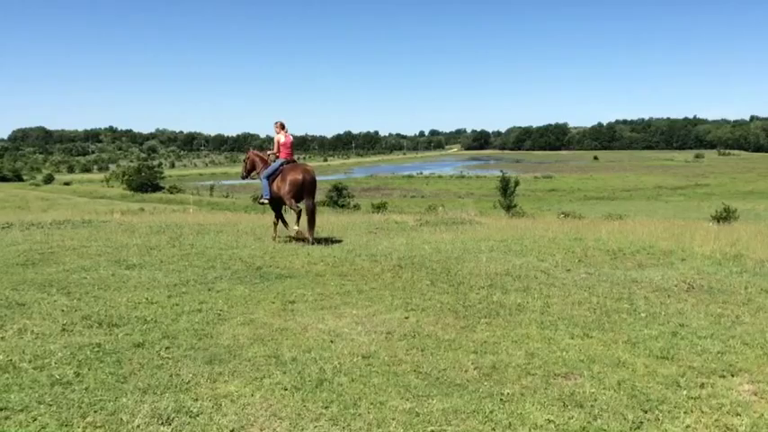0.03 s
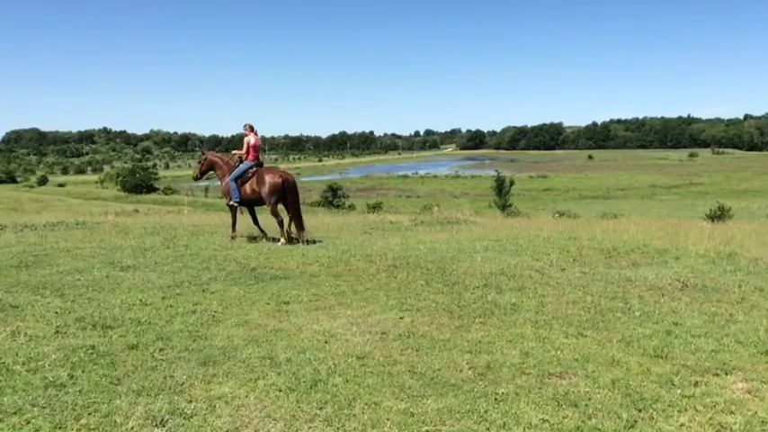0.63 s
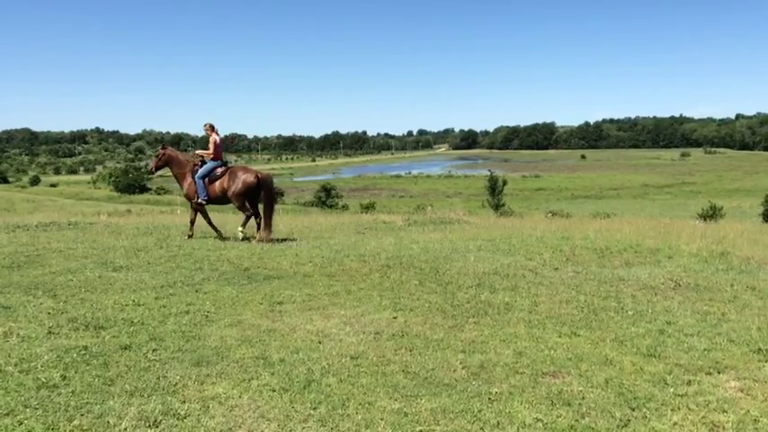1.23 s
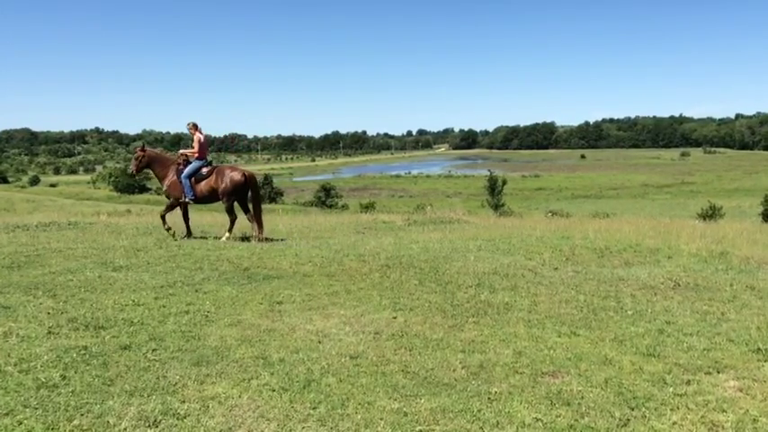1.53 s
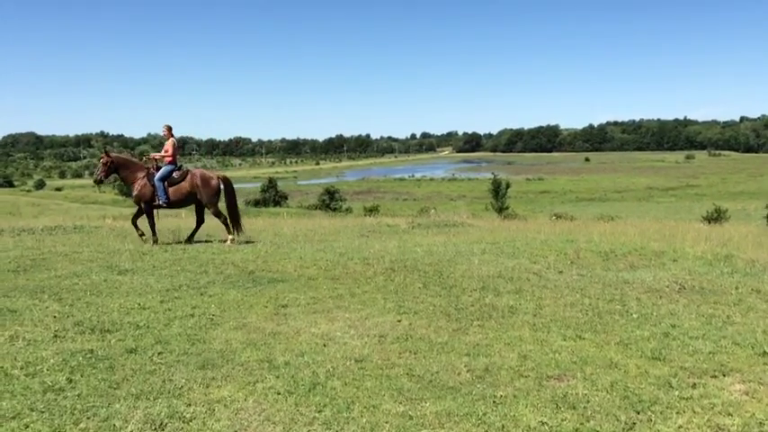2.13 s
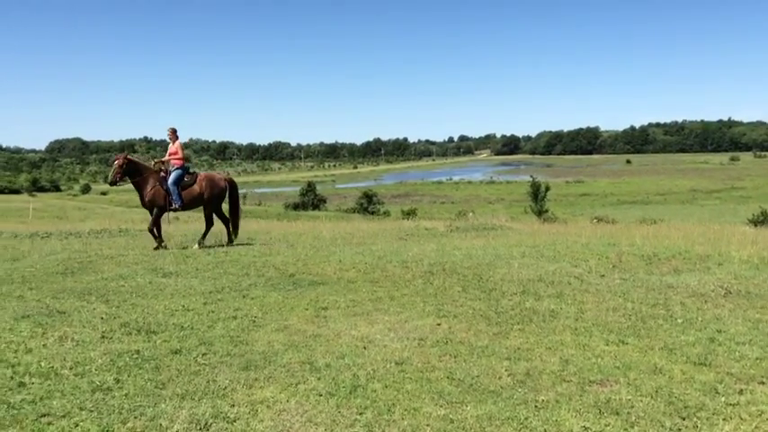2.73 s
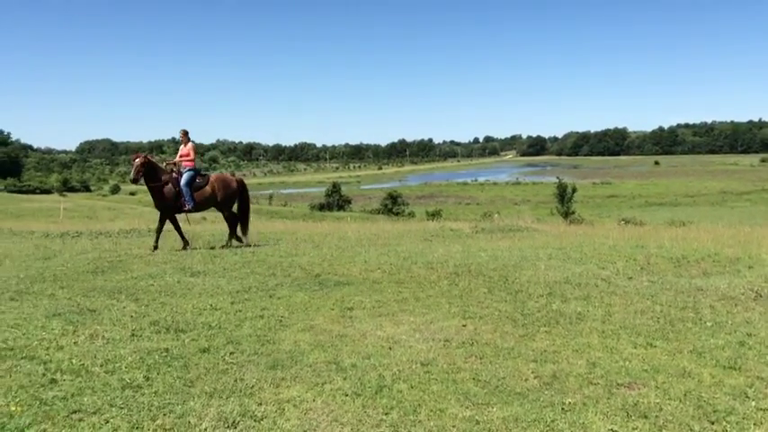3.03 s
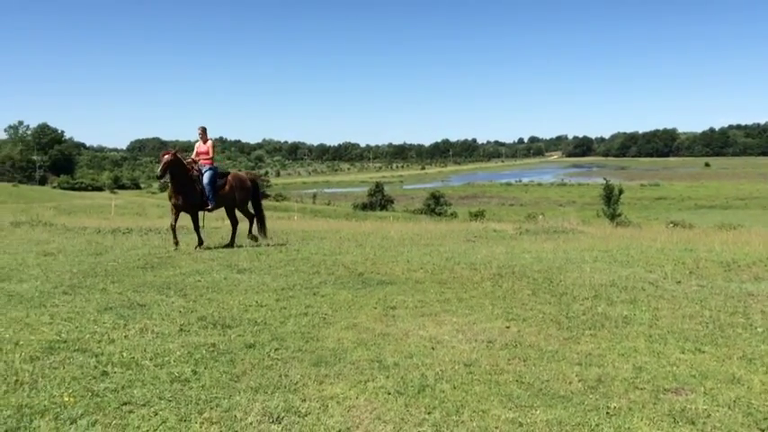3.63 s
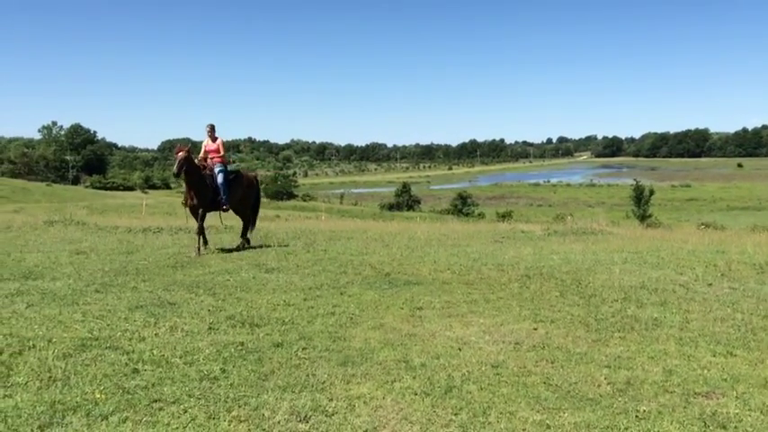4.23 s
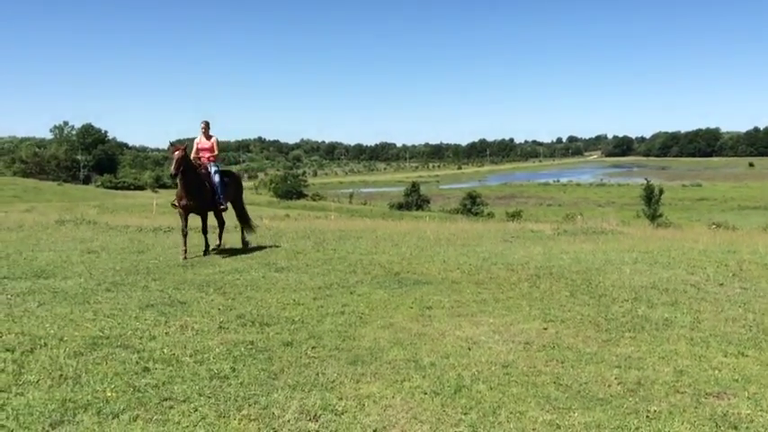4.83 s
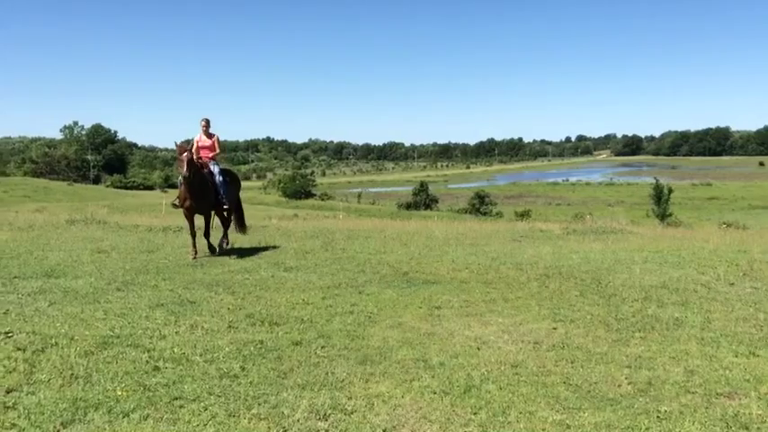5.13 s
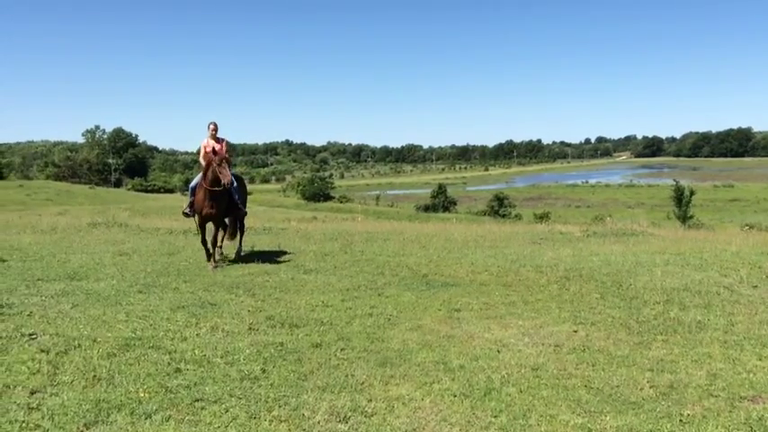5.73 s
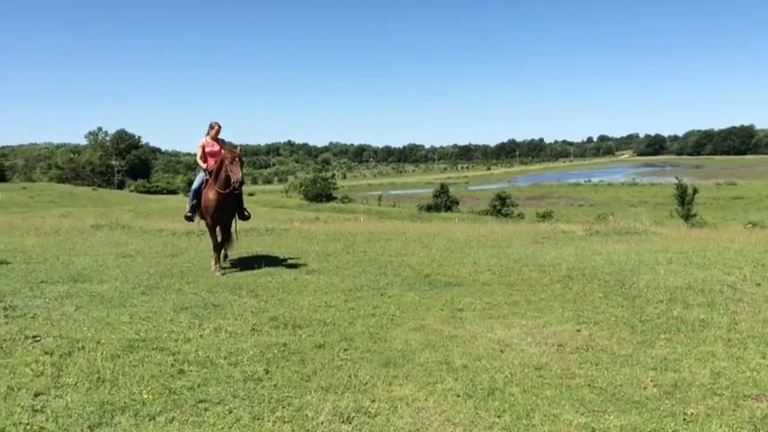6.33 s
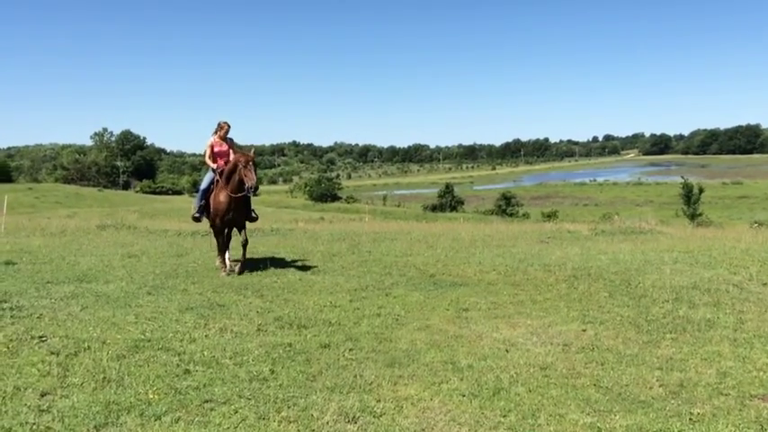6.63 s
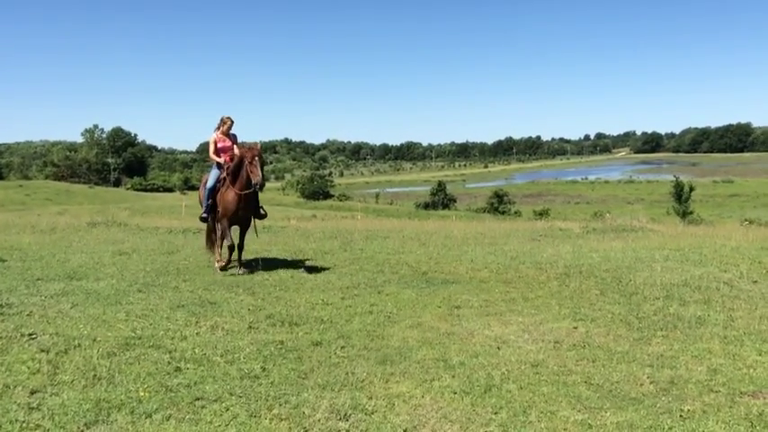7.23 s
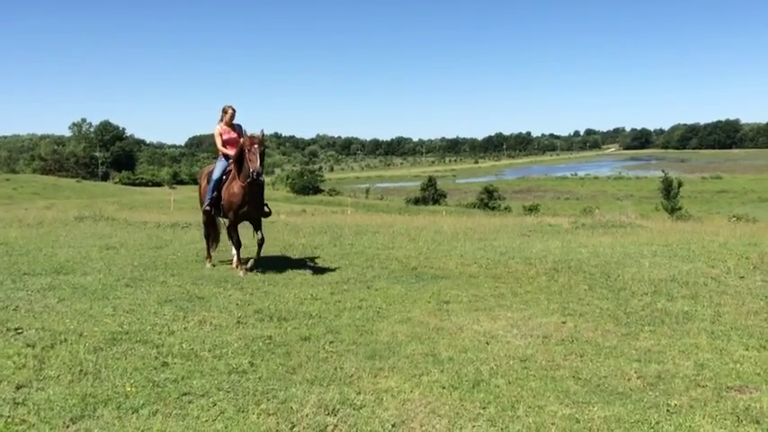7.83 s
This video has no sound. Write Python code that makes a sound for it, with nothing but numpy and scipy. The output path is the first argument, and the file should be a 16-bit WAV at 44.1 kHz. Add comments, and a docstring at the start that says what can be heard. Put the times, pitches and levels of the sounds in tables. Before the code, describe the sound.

An open pasture, with a low breeze on the microphone, faint dry grass rustle and a soft wash of distant trees. In the first 0.6 seconds a nearby bird sings three high, buzzy syllables, joined by wind thumps and light finger ticks. A distant bird whistles at about 1 second. From 2.3 to 4 seconds the wind buffets harder in irregular low bumps, peaking near 3.7. A quick, quiet trill comes at 3.8 seconds. From about 4.1 to 4.8 a horse snorts once, a fluttering, breathy run of nostril bursts. Two short bird chips follow just after 5 seconds as the wind eases. Between 6 and 7.2 an insect gives three very faint, thin rasps over a faint far drone. From 7.2 seconds more chips grow louder, with soft distant whistles and a last wind bump near 7.8.

```python
"""Horse snort in a windy pasture.

A horse snorts once: its nostrils flap, and each burst of air rings the nose and hisses.
Near birds sing three buzzy syllables, trill and give flight chips; far birds whistle and twitter.
Wind eddies buffet the microphone, dry grass rustles, fingers tick on the camera.
Behind them: an insect's thin rasps, the wash of distant trees and a faint drone."""
import sys
import numpy as np
from scipy import signal
from scipy.fft import rfft, irfft, next_fast_len
from scipy.io import wavfile
from scipy.ndimage import uniform_filter1d, map_coordinates

SR = 44100
rng = np.random.default_rng(int(sys.argv[2]) if len(sys.argv) > 2 else 0)


def master(y):
    """Save y as 16-bit WAV."""
    cut = np.clip(np.atleast_2d(y).T, -1, 1)
    pcm = np.round(cut * 32767)  # scale
    wavfile.write(sys.argv[1], SR, pcm.astype(np.int16))


N = 348390
TIME = np.arange(N) / SR

# Table levels are relative; the functions add their gains.
# air surges of the snort: peak t/s, width/s, level/dB, flap rate/Hz, main nasal f/Hz
SNORT_SURGES = [(4.092, .045, -58, 65, 1200), (4.24, .026, -45.5, 91, 1240), (4.303, .02, -58, 80, 1100),
                (4.37, .034, -50, 91, 1070), (4.493, .048, -52, 65, 1070), (4.63, .045, -53, 51, 1080)]
# air through the open nostrils: t/s, length/s, level/dB
NOSTRIL_AIR = [(4.18, 0.47, -69.5), (4.32, .0044, -59), (4.458, 0.0035, -60.5), (4.475, 0.096, -73.5),
               (4.592, 0.0036, -65.5), (4.797, 0.0044, -63.5)]
# nasal modes rung by flaps and by hiss: f/Hz, width/Hz, level/dB
FLAP_MODES = [(572, 88, 2), (1100, 63, 1.5), (1505, 175, -3.5)]
HISS_MODES = [(1960, 110, 6.5), (3380, 194, 1), (3770, 89, 6.5), (4330, 360, 2.5), (4860, 120, 1.5)]
# song syllables, flight chips: t/s, level/dB
SYLLABLES = [(.1450, -40.5), (.3420, -40), (0.542, -44)]
FLIGHT_CHIPS = [(5.0096, -56), (5.309, -57), (7.169, -61), (7.461, -55), (7.7200, -54), (7.812, -51),
                (7.8965, -48)]
# pips opening a syllable: t/s from the slur, length/s, start f/Hz, end f/Hz, level/dB
LISP_PIPS = [(-.114, .012, 7000, 8450, -16.5), (-.1, .007, 6100, 5100, -12), (-.099, .007, 7740, 7300, -15),
             (-.088, .006, 6570, 8300, -9.5), (-.076, .01, 7000, 7260, -12.5)]
# note contours: t/s from the note's anchor, f/Hz, level/dB
BUZZ_SHAPE = [(-.06, 4100, -22), (-.055, 4100, -7), (-.046, 4150, -.5), (-.015, 4150, -5), (0, 4500, -3)]
SLUR_SHAPE = [(0, 6400, -5), (.005, 4700, -1), (.013, 4270, 2), (.02, 3640, -0.5), (.028, 3320, -0.5),
              (.042, 3300, -19)]
RISE_SHAPE = [(-.005, 3800, -14), (-.002, 3950, 3), (.0005, 4600, -2), (.0025, 5300, -19)]
FALL_SHAPE = [(-.0005, 3100, -14), (.002, 3850, 8.5), (.0045, 3300, 6.5), (.011, 3010, 0),
              (.022, 2780, -14)]
SWEEP_SHAPE = [(0, 6000, -26), (.01, 5130, -10), (.019, 4250, 1), (.026, 3880, -20)]
HOOK_SHAPE = [(0, 4750, -17), (.005, 4110, -6), (.012, 3800, -2), (.019, 3740, -2.5), (.024, 3900, -20)]
# far whistles: t/s, length/s, start f/Hz, middle f/Hz, end f/Hz, level/dB
FAR_WHISTLES = [(.8, .11, 1490, 1470, 1460, -72), (1.058, .088, 2320, 2395, 2450, -54.5),
                (1.347, .033, 3580, 3520, 3460, -67), (1.765, .035, 2550, 2130, 2050, -70),
                (7.415, .1, 1930, 1965, 1920, -70), (7.565, .055, 2250, 2400, 2850, -70),
                (7.612, .035, 2780, 2900, 2680, -69), (7.665, .087, 2190, 2215, 2560, -69.5)]
# gusts at the microphone: t/s, length/s, level/dB
WIND_GUSTS = [(.38, 0.24, -49.5), (1.05, .12, -43.5), (2.29, 0.029, -39), (2.65, 0.095, -37),
              (2.94, .1, -38), (3.29, .04, -38), (3.41, 0.064, -40.5), (3.56, 0.13, -43), (3.69, .09, -42),
              (3.86, 0.037, -38), (4.0, 0.18, -42), (4.25, .28, -46.5), (4.645, 0.012, -39),
              (4.76, 0.092, -47.5), (5.17, 0.09, -47.5), (5.64, 0.084, -45.5), (7.84, .033, -40)]
# strongest single eddies at the port: t/s, level/dB, f/Hz
STRONG_EDDIES = [(0.458, -17.5, 206), (0.558, -24, 82), (0.5703, -19, 133), (0.6154, -23.5, 63),
                 (0.9925, -32, 197), (1.1509, -25.5, 206), (2.2973, -29.5, 182), (2.6276, -24, 160),
                 (2.761, -26, 137), (2.84, -27.5, 111), (2.9616, -22, 161), (2.984, -23.5, 146),
                 (3.02, -32.5, 148), (3.246, -27, 139), (3.2784, -26.5, 270), (3.4134, -25, 141),
                 (3.433, -31.5, 207), (3.5078, -25.5, 166), (3.6, -20, 115), (3.7374, -12, 199),
                 (3.7695, -24, 133), (3.779, -22.5, 100), (3.823, -28, 123), (3.8666, -20, 142),
                 (3.94, -28, 168), (4.257, -25.5, 180), (4.645, -28, 109), (4.758, -35.5, 140),
                 (4.968, -27.5, 126), (5.241, -28, 110), (5.7698, -24, 208), (7.8006, -23.5, 137)]
# eddy trains at the port: t/s, length/s, level/dB, f/Hz
EDDY_TRAINS = [(2.283, .035, -40.5, 231.3), (3.277, 0.039, -41, 290), (3.694, 0.02, -37.5, 189.6),
               (3.863, .022, -30, 159.8), (4.599, 0.0026, -35.5, 250), (5.173, 0.024, -50.5, 200.2),
               (4.949, 0.023, -32, 130)]
# dry grass swishes: t/s, length/s, level/dB
GRASS_SWISHES = [(.09, .07, -64), (.2, .05, -67), (.79, .11, -69), (1.01, .05, -61.5), (1.38, .04, -68),
                 (1.49, .04, -66), (1.73, .09, -68.5), (2.055, .04, -59), (2.27, .08, -68.5),
                 (2.61, .06, -70), (2.867, .06, -58.5), (3.34, .11, -67), (3.52, .045, -62),
                 (3.665, .06, -60.6), (3.96, .09, -62.5), (4.17, .17, -64), (4.4, .25, -68),
                 (4.785, .035, -60.2), (5.24, .32, -63.5), (5.85, .03, -73), (6.07, .035, -67),
                 (6.46, .04, -69.5), (6.88, .06, -71), (7.49, .04, -69), (7.71, .18, -73)]
# finger ticks: t/s, level/dB
FINGER_TICKS = [(0.168, -45), (0.4753, -40), (0.729, -50.5), (2.538, -51.5), (3.5573, -53), (7.4599, -54),
                (7.4985, -54)]
# insect scrapes: t/s, length/s
INSECT_RASPS = [(5.945, 0.042), (6.9, .037), (7.18, .031)]
# slow envelopes of breeze and tree wash: t/s, level/dB
BREEZE_LEVEL = [(0, -61.5), (1.7, -58), (4, -54.5), (6.3, -61.5), (7.3, -56.5), (7.9, -60)]
TREE_LEVEL = [(.6, -65), (1.9, -67.5), (6.5, -67)]
# noise spectra of gusts, grass and tree wash: f/Hz, level/dB
GUST_SPECTRUM = [(20, -52), (35, -6.5), (60, 11), (110, 8), (200, 0), (290, -14.5), (420, -27.5),
                 (700, -34), (1500, -58)]
GRASS_SPECTRUM = [(1000, -24), (5000, -7), (6200, -8), (7800, -6), (8400, 1), (11000, 0), (15000, -.5)]
TREE_SPECTRUM = [(20, -11.5), (70, 14.5), (160, 3), (300, -4), (600, -1.5), (1150, -6.5), (1800, -11),
                 (2700, -13), (4200, -17.5), (5500, -16), (6500, -22.5), (15000, -20.5)]
# far drone resonances: f/Hz, width/Hz, level/dB
DRONE_MODES = [(878, 20, 8), (1062, 120, 2), (1266, 154, -5.5), (1540, 130, -11.5)]


def snort(hiss_db=-.5, hiss_db_per_s=4, hiss_ref_s=4.1):
    """Nostrils flap at each surge's own rate; every flap passes air that rings the nose and hisses."""
    breath_spectrum = [(200, 2), (500, 8.5), (1200, 4.5), (1700, -1), (3000, -26), (6000, -35)]
    hiss_spectrum = [(1500, -10), (3000, -2), (5500, -7.5), (6500, 0), (11000, 18)]
    low_mode, main_mode, high_mode = FLAP_MODES
    flaps, chop = np.zeros((2, N))
    for s, width_s, db, flap_hz, nasal_hz in SNORT_SURGES:
        phase = 2 * np.pi * (flap_hz * (TIME - s) + .09 * wobble(45))
        push = np.exp(-.75 * ((TIME - s) / width_s) ** 2)
        opening = unit(.15 + np.exp(1.4 * (np.cos(phase) - 1) + .25 * wobble(90)))
        nose = [low_mode, (nasal_hz, *main_mode[1:]), high_mode]
        flaps += amp(db) * push * resonances(opening * noise(breath_spectrum), nose)
        chop += push * opening
    hiss = resonances((1 + chop) * noise(hiss_spectrum), HISS_MODES)
    airflow = swells(NOSTRIL_AIR, attack_s=.0055, release_s=.011)
    return flaps + airflow * amp(hiss_db + hiss_db_per_s * (TIME - hiss_ref_s)) * hiss


def songbird(pulse_s=.00993, join_s=.0162, lisp_db=-1, slur_db=1):
    """Per syllable: a thin two-voiced lisp, a buzz whose pulses merge, a loud falling slur."""
    out = np.zeros(N)
    for s, db in SYLLABLES:
        buzz = note(BUZZ_SHAPE, warble=.35, warble_hz=370 * (1 + rng.normal(0, .029)))
        t = BUZZ_SHAPE[0][0] + np.arange(len(buzz)) / SR
        gate = np.where(t < -join_s, np.abs(np.sin(np.pi * t / pulse_s)) ** 1.3, 1)
        add(out, s + t[0], amp(db) * buzz * uniform_filter1d(gate, size=40))
        for offset_s, *pip in LISP_PIPS:
            add(out, s + offset_s, amp(db + lisp_db) * glide(*pip, warble=.031, warble_hz=325))
        add(out, s, amp(db + slur_db) * note(SLUR_SHAPE))
    return out


def flying_bird(gap_s=.0108, first_db=-4, cut_s=.0055, echo_db=-10, echo_s=.0024):
    """Per chip: two flicks of a rising and a falling voice, the first weak and short; ground echo."""
    out = np.zeros(N)
    for s, db in FLIGHT_CHIPS:
        scale = 1 + rng.normal(0, .015)
        delay_s = echo_s * rng.uniform(.4, 2)
        flicks = [(s - gap_s, db + first_db, cut_s), (s, db, FALL_SHAPE[-1][0])]
        for flick_s, flick_db, ring_s in flicks:
            fall = note(FALL_SHAPE, scale)
            fall *= np.exp(-(np.arange(len(fall)) / SR / ring_s) ** 6)
            for at_s, path_db in [(flick_s, flick_db), (flick_s + delay_s, flick_db + echo_db)]:
                rise_db = path_db + rng.normal(0, 1.3)
                rise = note(RISE_SHAPE, scale, warble=.072, warble_hz=450)
                add(out, at_s + RISE_SHAPE[0][0], amp(rise_db) * rise)
                add(out, at_s + FALL_SHAPE[0][0], amp(path_db) * fall)
    return scatter(out, t60_s=.2, wet_db=-12)


def trilling_bird(start_s=3.7935, period_s=.0262, gain_db=-57.5, hold_s=.22, fade_db_per_s=90):
    """A downward sweep, then an even run of short hooks that holds and fades."""
    out = np.zeros(N)
    for k in range(13):
        age_s = k * period_s
        db = gain_db - fade_db_per_s * max(age_s - hold_s, 0)
        tone = note(HOOK_SHAPE if k else SWEEP_SHAPE, scale=1 + rng.normal(0, .005))
        add(out, start_s + age_s, amp(db) * tone)
    return out


def wind(gust_db=.5, wake_db=-10.5, eddy_db=3, stray_db=7, stray_hz=190, strays=260):
    """Faint breeze, turbulent gusts, strong eddies with wakes; stray eddies ride on the gusts."""
    breeze = amp(curves(BREEZE_LEVEL)[0] + 3.1 * wobble(13))
    breeze *= noise([(20, -27), (40, -5), (70, 5), (140, -4.5), (250, -13), (600, -43.5), (2000, -120)])
    churn = noise(GUST_SPECTRUM)
    churn /= np.sqrt(np.abs(uniform_filter1d(churn ** 2, size=1500)) + .22)  # even strength
    churn = unit(churn * amp(5.5 * np.tanh(wobble(45))))  # lumps from larger eddies
    gusts = swells(WIND_GUSTS, attack_s=.021, release_s=.031)
    wakes = swells([(s, 0, db + wake_db) for s, db, _ in STRONG_EDDIES], attack_s=.015, release_s=.015)
    eddies, lead_s = np.zeros(N), .02
    for s, db, hz in STRONG_EDDIES:
        add(eddies, s - lead_s, amp(db + eddy_db) * eddy(hz))
    force = gusts.max() * (gusts / gusts.max()) ** 1.2
    for k, (when, size, pitch, side) in enumerate(rng.uniform(-.94, 1, (strays, 4))):
        at = int((k + (when + 1) / 2) / strays * N)
        gain = np.sign(side) * force[at] * amp(stray_db + 4 * size)
        spike = eddy(stray_hz * 2 ** (pitch / 2), width_cycles=.25, swing=.43)
        add(eddies, at / SR - lead_s, gain * spike)
    return breeze + np.hypot(amp(gust_db) * gusts, wakes) * churn + eddies


def eddy(hz, width_cycles=.17, swing=.44):
    """Rounded pressure spike that swings back; a smaller eddy passes faster."""
    t = np.arange(-SR // 50, SR // 20) / SR
    spike = np.exp(-(t * hz / width_cycles) ** 2)
    return signal.lfilter(*signal.butter(2, swing * hz, "high", fs=SR), spike)


def buffets():
    """Eddy trains shed at the microphone port, each a thump around one wandering pitch."""
    out = np.zeros(N)
    for s, length_s, db, hz in EDDY_TRAINS:
        phase = 2 * np.pi * np.cumsum(hz * 2 ** (.36 * wobble(hz))) / SR
        thump = unit(np.sin(phase) * amp(3 * wobble(hz / 2)))
        out += swells([(s, length_s, db)], attack_s=.006, release_s=.0082) * thump
    return out


def grass(hard_db=-60.5, snap_s=.004, soft_s=.045, rest_db=-75.5, calming_db_per_s=.8):
    """Dry blades brush in grainy swishes over a faint hiss; the hardest start abruptly."""
    attacks_s = [snap_s if db > hard_db else soft_s for _, _, db in GRASS_SWISHES]
    swishes = swells(GRASS_SWISHES, attacks_s, release_s=.07)
    rest = amp(rest_db - calming_db_per_s * TIME + 1.8 * wobble(12))
    level = np.hypot(swishes, rest) * amp(1.1 * wobble(22))
    grains = unit(noise(GRASS_SPECTRUM) * amp(2 * wobble(750)))
    return level * grains


def finger_ticks(gain_db=-6, t60_s=.078):
    """Fingers on the camera: small, bright, decaying noise bursts."""
    envelope, t = np.zeros(N), np.arange(SR // 10) / SR
    for s, db in FINGER_TICKS:
        add(envelope, s, amp(db + gain_db - 60 * t / t60_s))
    return envelope * noise([(2000, -1.5), (6000, 1), (9000, 9), (15000, 8.5)])


def far_birds(warble_s=1.39, step_s=.0125, sag_hz_per_s=420, twitter_hz=5320, chips=620):
    """Soft bent whistles, one sinking two-pitched warble, a steady twitter of high chips."""
    out, warble = np.zeros((2, N))
    for s, *shape in FAR_WHISTLES:
        add(out, s, whistle(*shape))
    for k in range(29):
        age_s = k * step_s
        hz = (3480 if k % 2 else 2660) - sag_hz_per_s * age_s + rng.normal(0, 95)
        tone = glide(2 * step_s, hz + 140, hz - 140, db=-75.5, warble=.04, warble_hz=150)
        add(warble, warble_s + age_s, tone)
    chip = [(0, twitter_hz + 200, 5), (.009, twitter_hz, 4), (.022, twitter_hz - 200, -11)]
    for when, size, pitch in rng.uniform(-1.2, 1, (chips, 3)):
        add(out, (when + 1) / 2 * N / SR, amp(-83 + 3 * size) * note(chip, scale=1 + .045 * pitch))
    return out + scatter(warble, t60_s=.22, wet_db=3)


def whistle(length_s, start_hz, middle_hz, end_hz, db):
    """Tone that scoops into its middle pitch and bends away as it fades."""
    return note([(0, start_hz, db - 12),
                 (.2 * length_s, middle_hz + (start_hz - middle_hz) / 4, db - 1),
                 (.5 * length_s, middle_hz, db),
                 (.75 * length_s, middle_hz + (end_hz - middle_hz) / 4, db - 3),
                 (length_s, end_hz, db - 7)])


def insect(wing_hz=13520, width_hz=130, rasp_db=-72):
    """Short scrapes ring one very high wing resonance."""
    scrapes = swells([(*rasp, rasp_db) for rasp in INSECT_RASPS], attack_s=.007, release_s=.011)
    return scrapes * resonances(rng.standard_normal(N), [(wing_hz, width_hz, 0)])


def distant_trees(wash_db=4):
    """Even wash of far trees, with a faint wavering drone that grows midway."""
    drone = resonances(noise([(500, -26), (1400, -8)]), DRONE_MODES)
    drone_db = np.interp(TIME, [4.5, 6.5], [-12, -4])
    level = amp(curves(TREE_LEVEL)[0] + .5 * wobble(5))
    return level * (amp(wash_db) * noise(TREE_SPECTRUM) + amp(drone_db) * drone)


def note(shape, scale=1, warble=0, warble_hz=0):
    """Unsteady tone along a (t/s, f/Hz, level/dB) contour; warble flicks it upward and thins it."""
    t = np.arange(shape[0][0], shape[-1][0], 1 / SR)
    hz, db = curves(shape, t)
    drift, shimmer_db = [map_coordinates(k, [(t - t[0]) * 400]) for k in rng.standard_normal((2, 80))]
    flick = warble * np.sin(np.pi * warble_hz * t + .45 * drift) ** 4
    pitch_hz = hz * scale * (1 + flick + .007 * drift)
    edges = np.clip(np.minimum(t - t[0], t[-1] - t) / .001, 0, 1)
    return edges * amp(db + shimmer_db) / (1 + flick) * np.sin(2 * np.pi * np.cumsum(pitch_hz) / SR)


def glide(length_s, start_hz, end_hz, db, **voice):
    """Straight pitch glide with rounded ends."""
    tone = note([(0, start_hz, db), (length_s, end_hz, db)], **voice)
    return tone * np.abs(np.sin(np.linspace(0, np.pi, len(tone)))) ** .5


def scatter(x, t60_s, wet_db):
    """x plus a diffuse tail from ground and trees."""
    t = np.arange(SR // 2) / SR
    tail = rng.standard_normal(len(t)) * amp(-60 * t / t60_s)
    return x + amp(wet_db) * signal.fftconvolve(x, tail / np.linalg.norm(tail))[:N]


def swells(rows, attack_s, release_s):
    """Power-summed envelope of (t/s, length/s, level/dB) rows; attack and release span 10 dB each."""
    power = np.zeros(N)
    for (s, length_s, db), rise_s in zip(rows, np.broadcast_to(attack_s, len(rows))):
        t = np.arange(-min(4 * rise_s, s), length_s + 4 * release_s, 1 / SR)
        outside = np.maximum(-t / rise_s, 0) + np.maximum((t - length_s) / release_s, 0)
        add(power, s + t[0], amp(db - 10 * outside) ** 2)
    return np.sqrt(power)


def resonances(x, modes):
    """x through (f/Hz, width/Hz, level/dB) modes of alternating sign, at rms 1."""
    def response(f):
        return sum((-1) ** k * amp(db) * 1j * f * width / (hz * hz - f * f + 1j * f * width)
                   for k, (hz, width, db) in enumerate(modes))
    return unit(filtered(x, response))


def noise(spectrum):
    """Noise coloured by (f/Hz, level/dB) points, at rms 1."""
    hz, db = np.transpose(spectrum)
    white = rng.standard_normal(N)
    return unit(filtered(white, lambda f: amp(np.interp(np.log(f + 1), np.log(hz), db))))


def filtered(x, response):
    """x through a frequency response."""
    size = next_fast_len(N + SR // 2)
    return irfft(rfft(x, size) * response(np.fft.rfftfreq(size, 1 / SR)), size)[:N]


def wobble(rate_hz):
    """Smooth random curve with knots at rate_hz."""
    return map_coordinates(rng.standard_normal(int(N * rate_hz / SR) + 4), [TIME * rate_hz])


def curves(rows, t=TIME):
    """Each column after the time, interpolated at t."""
    s, *columns = np.transpose(rows)
    return [np.interp(t, s, column) for column in columns]


def add(track, s, sound):
    """Mix sound in at s seconds."""
    start = max(round(s * SR), 0)
    part = track[start:start + len(sound)]
    part += sound[:len(part)]


def amp(db):
    return 10 ** (np.asarray(db) / 20)


def unit(x):
    return x / np.sqrt(np.mean(x ** 2) + 1e-20)


def scene():
    """The pasture at one microphone; far birds are wetter than near ones."""
    near = scatter(songbird() + flying_bird() + trilling_bird() + snort(), t60_s=.12, wet_db=-19)
    far = scatter(far_birds(), t60_s=.3, wet_db=-11)
    return (near + far + insect() + wind() + buffets() + grass() + finger_ticks() + distant_trees())[None]


def record(dry):
    """Brick-wall band limit of the camera."""
    return np.array([filtered(channel, lambda hz: hz < 15450) for channel in dry])


dry = scene()
out = record(dry)
master(out)
```